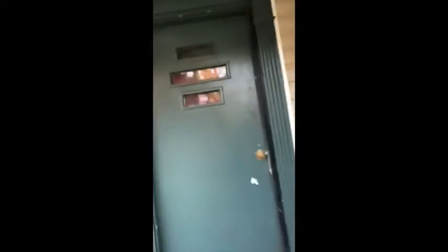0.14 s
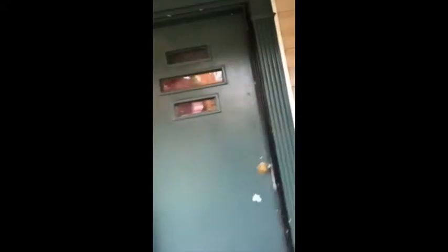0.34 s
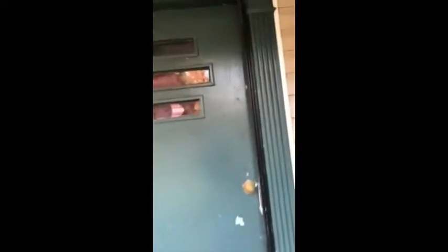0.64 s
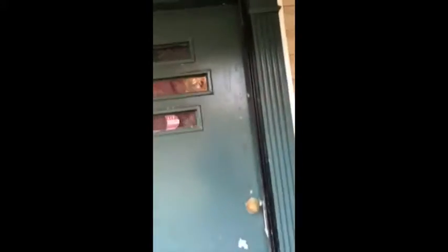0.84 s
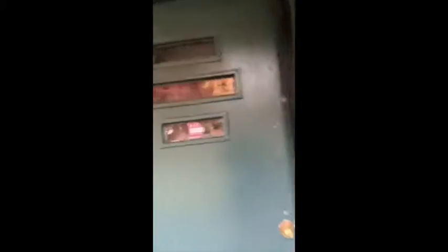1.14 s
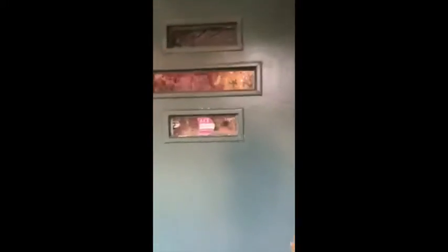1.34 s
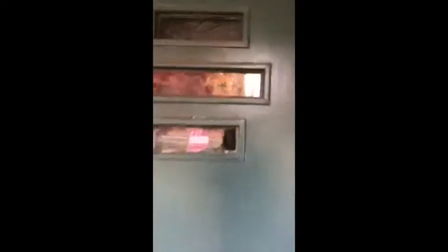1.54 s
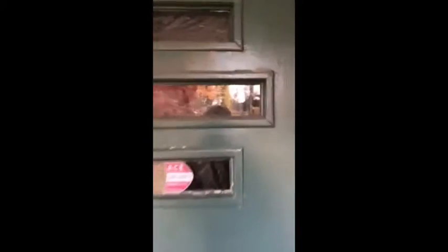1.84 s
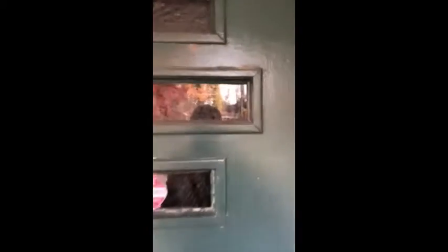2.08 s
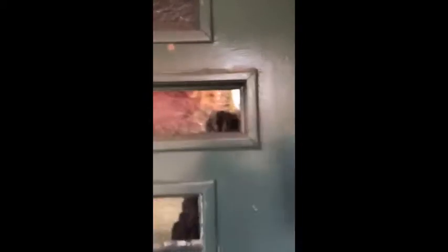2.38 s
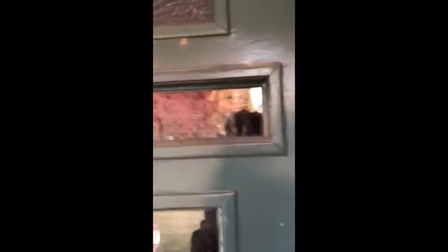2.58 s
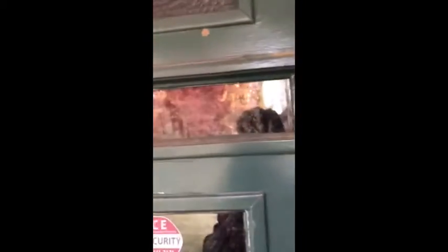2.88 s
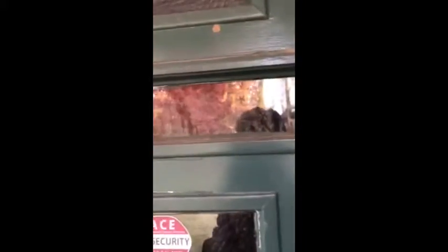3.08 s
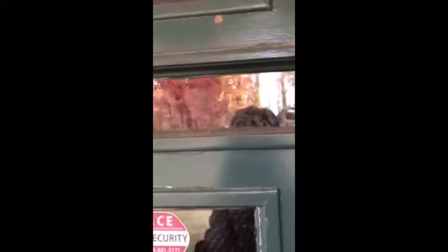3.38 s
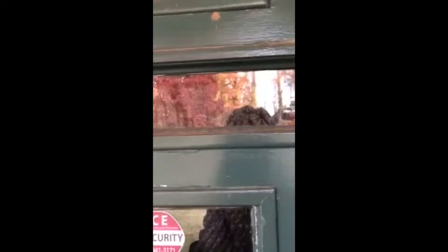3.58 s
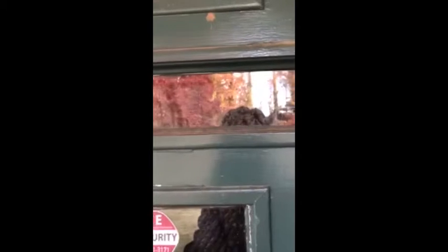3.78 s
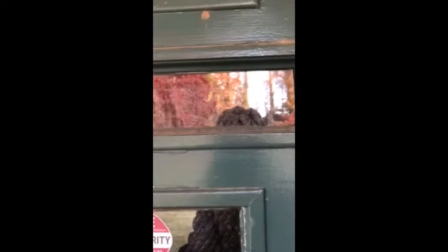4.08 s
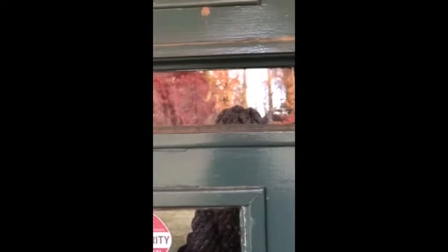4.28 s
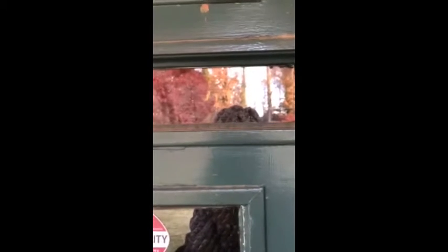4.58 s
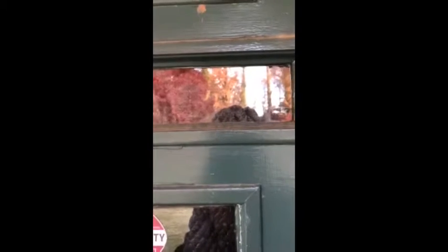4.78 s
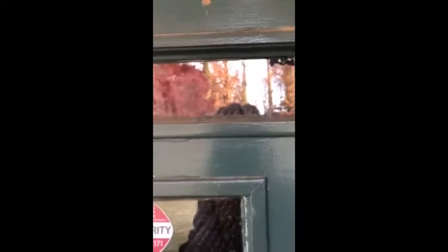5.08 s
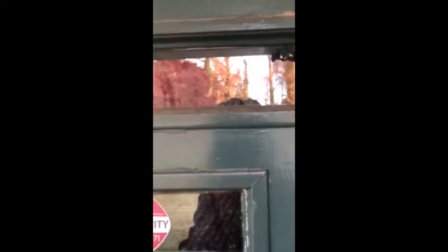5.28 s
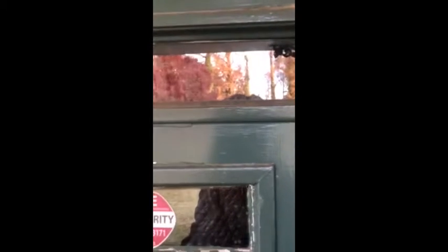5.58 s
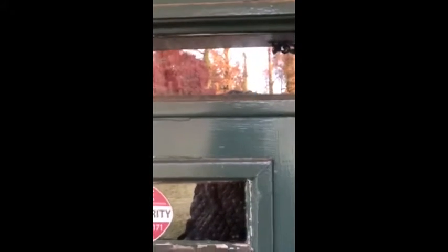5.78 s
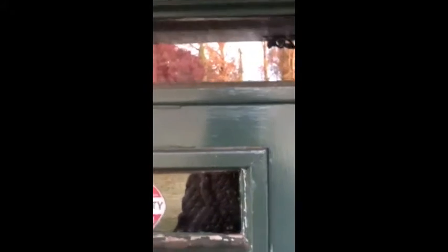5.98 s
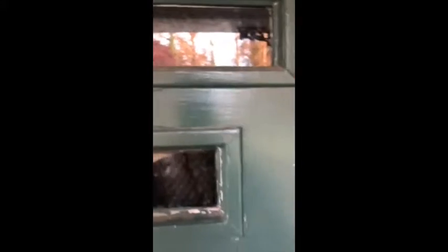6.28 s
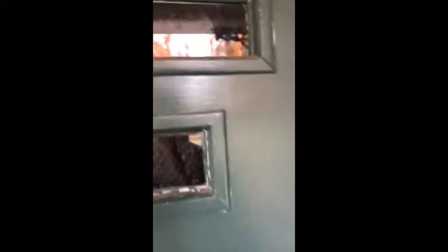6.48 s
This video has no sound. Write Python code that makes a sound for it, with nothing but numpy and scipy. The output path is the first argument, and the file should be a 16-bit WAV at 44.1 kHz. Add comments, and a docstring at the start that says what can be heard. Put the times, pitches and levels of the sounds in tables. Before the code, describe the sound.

Very quiet outdoor doorway, microphone at arm's length from the door. Light footfalls, ticks and cloth hiss lead to five loud, dry knuckle knocks on painted wood: three about a third of a second apart, two with wider gaps. Each has a sharp crack, a damped boxy body and a short porch tail. Afterwards comes a soft dull tap with a board thump and rustling.

```python
"""Knuckles rap five times on a wooden front door with glass panes, heard from the porch at arm's length.
Each blow excites damped door modes; dispersive bending waves carry the treble out first.
Shaped noise gives the skin's crack, the short porch tail and a long faint wash from far house fronts.
Around it, noise bursts make scuffs and ticks, decaying sines make tinkles and footfalls on boards,
swelling hiss makes rubbing cloth, wavering sines a mains hum and smooth noise a far traffic murmur."""
import sys
import numpy as np
from scipy import signal
from scipy.fft import rfft, irfft
from scipy.io import wavfile
from scipy.ndimage import uniform_filter1d

SR = 44100
rng = np.random.default_rng(int(sys.argv[2]) if len(sys.argv) > 2 else 0)


def bounce(signal):
    """Save signal as a 16-bit WAV file at the path given by the first command-line argument."""
    frames = np.transpose(np.atleast_2d(signal))
    limited = np.clip(frames, -1, 1)
    pcm = np.round(limited * 32767).astype(np.int16)
    wavfile.write(sys.argv[1], SR, pcm)


N = 292716   # length in samples

# blows on the door: start_s, level_db, knuckle_gap_s, snap_centre_hz, snap_db, crack_db, panel_ring_db,
# door_thud_db, push_db, crack_tilt_db_per_octave (the part levels are relative to level_db)
KNOCKS = [(2.9182, -6.5, 0.0013, 1040, 0.5, -18, -15.5, -15.5, -3.5, 1),
          (3.2798, -5, 0.0014, 1020, -1, -14.5, -24.5, -14, -9.5, 0),
          (3.65, -5, 0.0014, 720, -2, -13.5, -16, -16.5, -6, -1),
          (4.4161, -5, 0.000646, 1654, -2, -9.5, -18, -13, -10, -3),
          (5.3046, -6, 0.0013, 940, -2.5, -10, -15, -14, -8, 0.5)]


def from_db(db):
    """Level to amplitude: 20 dB is a factor of ten."""
    return 10 ** (np.asarray(db) / 20)


def tilt_db(hz, slope_db, pivot_hz):
    """Spectral tilt: a slope in dB per octave about a pivot."""
    return slope_db * np.log2(hz / pivot_hz)


def rms_one(x):
    """Normalization to unit root-mean-square."""
    return x / np.sqrt(np.mean(x ** 2) + 1e-20)


def in_time(rows):
    """Linear interpolation of each level column at every sample."""
    s, *columns = np.transpose(rows)
    return [np.interp(np.arange(N) / SR, s, c) for c in columns]


def at_hz(points, hz):
    """Linear interpolation of a spectrum on a log-frequency axis."""
    point_hz, values = np.transpose(points)
    return np.interp(np.log(hz), np.log(point_hz), values)


def lumps(size, width):
    """Moving average of white noise: wobble of rms 1 with bumps about width points long."""
    return rms_one(uniform_filter1d(rng.standard_normal(size), max(round(width), 2)))


def drift(rate_hz):
    """Two-pole low-passed noise: a slow random wander of spread about 1."""
    step, settle = 40, 2000   # samples per slow point; slow points dropped while the filter settles
    r = np.exp(-2 * np.pi * rate_hz * step / SR)
    noise = rng.standard_normal(N // step + settle + 2)
    slow = signal.lfilter([1], [1, -2 * r, r * r], noise)[settle:]
    return np.interp(np.arange(N) / step, np.arange(len(slow)), rms_one(slow))


def modes(table, size, spread_db):
    """Impulse response by modal synthesis: one decaying sine per row, with chance strengths."""
    hz, db, t60 = np.transpose(table)[:, :, None]
    t = np.arange(size) / SR
    strength = from_db(db + spread_db * rng.standard_normal(hz.shape))
    signs = (-1) ** np.arange(len(hz))[:, None]
    return signs * strength * from_db(-60 * t / t60) * np.sin(2 * np.pi * hz * t)


def coloured(spectrum, size, peaky_db=0):
    """Spectral shaping of white noise, with chance peaks if asked; rms 1."""
    hz = np.maximum(np.arange(size // 2 + 1) * SR / size, 1)
    peak_width_hz = 300
    peaks_db = peaky_db * lumps(len(hz), peak_width_hz * size / SR) if peaky_db else 0
    gain = from_db(at_hz(spectrum, hz) + peaks_db)
    return rms_one(irfft(rfft(rng.standard_normal(size)) * gain, size))


def add(out, s, sound):
    """Superposition: mix a sound in at time s."""
    i = round(s * SR)
    out[i:i + len(sound)] += sound[:N - i]


def knocks():
    """Modal excitation and dispersion: each blow rings the door, bending waves delay lows by 1 / root of Hz."""
    # natural modes of the whole door and its panels: frequency_hz, relative_db, t60_s
    door_modes = [(46.1, -8.5, 0.39), (60.9, -11, 0.16), (78, -11, 0.45), (94, -16.5, 0.25),
                  (118.8, -13, 0.34), (150.4, -16.5, 0.47), (188.7, -18.5, 0.47), (221, -15.5, 0.43),
                  (250, -14.5, 0.14), (319.4, -1.5, 0.22), (338.7, -4.5, 0.23), (351, -7, 0.163),
                  (380, -1, 0.15), (497.6, -6, 0.084), (588, -4, 0.19), (559.7, -11.5, 0.072),
                  (662, -15, 0.29), (721, -11.5, 0.17), (859, -11.5, 0.19), (937, -8.5, 0.24),
                  (1390, -10, 0.04)]
    # quickly damped modes under the knuckle: frequency_hz, relative_db, t60_s
    spot_modes = [(417.5, -5.5, 0.076), (614, -6.5, 0.0165), (1036, 1, 0.016), (1210, 3, 0.007),
                  (1826, 1, 0.012), (2650, -8, 0.012), (3205, -32, 0.0016), (5760, -22, 0.005)]
    # the panel giving under the hand: frequency_hz, t60_s
    push_hz, push_t60 = (350, .022)
    # three knuckles landing one after another: relative_db
    knuckles_db = (-2, 1, 1)
    # skin on paint: frequency_hz, relative_db (per Hz)
    crack_spectrum = [(1500, 6), (3000, 8.5), (4200, 0.5), (5600, 2), (7000, -8), (9000, -8.5),
                      (16000, -22.5)]
    tail_db = -10   # porch tail, relative to the knock's level
    bending = .045   # travel time (s) times root of Hz

    out, size = np.zeros(N), 32768
    hz, t = np.arange(size // 2 + 1) * SR / size, np.arange(size) / SR
    delay = bending / np.sqrt(np.clip(hz, 40, 2500)) - bending / np.sqrt(2500)
    # phase is the running sum of group delay over frequency
    dispersion = np.exp(-2j * np.pi * np.cumsum(delay) * SR / size)
    travel = dispersion / (1 + 1j * hz / 4000) ** 2   # softened above 4 kHz
    whole_door = np.array(door_modes)[:, 0] < 200
    spot_hz = np.array(spot_modes)[:, 0]
    fade = np.clip((.7 - t) / .3, 0, 1)
    for s, db, gap, snap_hz, snap_db, crack_db, ring_db, thud_db, push_db, slope_db in KNOCKS:
        door = from_db(np.where(whole_door, thud_db, ring_db)) @ modes(door_modes, size, 2.0)
        door += modes([(push_hz, push_db, push_t60)], size, 0)[0]
        # where the hand lands favours the spot modes near one pitch
        favour_db = np.maximum(-7.0 * np.log2(spot_hz / snap_hz) ** 2, -9.0)
        spot = from_db(snap_db + favour_db) @ modes(spot_modes, size, 1.0)
        hand = sum(from_db(k_db) * np.exp(-2j * np.pi * hz * gap * k) for k, k_db in enumerate(knuckles_db))
        blow = irfft((rfft(door) + hand * rfft(spot)) * travel, size)
        tilted = [(f, level_db + tilt_db(f, slope_db, 4000)) for f, level_db in crack_spectrum]
        crack_envelope = from_db(crack_db - 60 * t / .014) * (1 - np.exp(-t / .0006))
        crack = coloured(tilted, size) * crack_envelope
        tail = from_db(tail_db) * porch_tail(size)
        add(out, s, from_db(db) * fade * (blow + crack + tail))
    return out


def porch_tail(size):
    """Reverberation: diffuse reflections and dense upper modes, each band dying at its own rate."""
    # tail colour: frequency_hz, relative_db (per Hz)
    porch_spectrum = [(120, -33.5), (200, -16), (330, -18.5), (600, -18), (800, -24.5), (1050, -27.5),
                      (1400, -24), (2000, -35), (2800, -44.5), (5000, -53.5), (9000, -62), (16000, -73)]
    # reverberation time: frequency_hz, t60_s
    porch_decay = [(200, 0.28), (500, 0.25), (1000, 0.22), (2000, 0.29), (3500, 0.26), (7000, 0.24),
                   (13500, 0.232)]
    t, noise, out = np.arange(size) / SR, coloured(porch_spectrum, size), 0
    edges = 150 * 2 ** np.arange(0, 7.1, .5)   # half-octave band edges, Hz
    for low, high in zip(edges, edges[1:]):
        band = signal.sosfilt(signal.butter(2, [low, high], "band", fs=SR, output="sos"), noise)
        out = out + band * from_db(-60 * t / at_hz(porch_decay, np.sqrt(low * high)))
    build_up = 1 - np.exp(-t / .003)
    # panes and latch rattle, so the tail is lumpy
    return out * build_up * from_db(1.5 * lumps(size, .006 * SR))


def far_echo():
    """Diffuse reflection: far house fronts answer each knock with a faint wash; their powers add."""
    # colour of the wash: frequency_hz, relative_db (per Hz)
    echo_spectrum = [(100, -17.5), (300, 2), (600, 8.5), (1200, 0), (2200, -14), (4000, -37)]
    echo_db, rise_s, t60_s = -44.5, .1, 1.56   # echo_db is relative to the knock's level
    power = 0
    for s, db, *_ in KNOCKS:
        t = np.maximum(np.arange(N) / SR - s, 0)
        envelope = from_db(db + echo_db - 60 * t / t60_s) * (1 - np.exp(-t / rise_s))
        power = power + envelope ** 2
    return np.sqrt(power) * coloured(echo_spectrum, N)


def scuffs():
    """Friction and impact noise: each tick or scuff is a dying noise burst coloured around its centre."""
    # ticks and scuffs: start_s, level_db, centre_hz, t60_s, fall_above_centre_db_per_octave
    tick_rows = [(0.123, -57, 9000, 0.028, -1), (0.133, -51.5, 9600, 0.14, 0),
                 (0.215, -57.5, 10100, 0.1, 2), (.422, -68.5, 12000, 0.2, 0), (0.719, -63, 5800, 0.22, -10),
                 (.764, -51.5, 3600, .13, -13), (1.065, -64.5, 3500, 0.12, -7.5),
                 (1.594, -48.5, 3030, 0.12, -13.5), (1.725, -61.5, 3100, 0.081, -7),
                 (2.304, -55.5, 1020, 0.16, -13), (2.497, -58.5, 3550, 0.22, -9.5),
                 (2.585, -47, 4930, 0.022, -13), (2.647, -47.5, 4200, 0.21, -7.5),
                 (2.745, -48.5, 2220, 0.19, -6.5), (3.421, -56.5, 6000, 0.018, -7),
                 (3.763, -61.5, 6900, 0.034, -10), (4.79, -57, 3300, 0.04, -20),
                 (4.8, -61.5, 4030, 0.023, -4), (4.944, -47, 3770, 0.032, -9.5),
                 (5.56, -47.5, 3530, 0.04, -9.5), (5.604, -55, 3540, 0.037, -8),
                 (6.038, -49.5, 1440, 0.19, -18), (6.068, -34.5, 1800, 0.068, -8),
                 (6.105, -47, 1510, 0.093, -12.5), (6.357, -61, 5500, 0.024, -21),
                 (6.37, -52.5, 5600, 0.019, -17)]
    rise_share, hold_share = 0.02, 0.049   # shares of t60: longer scuffs drag before dying
    out, t = np.zeros(N), np.arange(8192) / SR
    for s, db, hz, t60, fall_db in tick_rows:
        rise = 1 - np.exp(-t / (.0004 + rise_share * t60))
        decay = from_db(db - 60 * np.maximum(t / max(t60, .005) - hold_share, 0))
        # grit makes the burst lumpy
        envelope = rise * decay * from_db(0.79 * lumps(len(t), .0022 * SR))
        spectrum = [(hz / 6, -30), (hz / 2, -3.0), (hz, 0), (hz * 2, fall_db), (hz * 8, 3 * fall_db)]
        add(out, s, envelope * coloured(spectrum, len(t), peaky_db=4))
    return out


def tinkles():
    """Free vibration of small metal bits: three inharmonic partials, two of them beating closely."""
    # tinkles: start_s, pitch_hz, level_db
    tinkle_rows = [(.535, 13100, -62), (.537, 10300, -58.5), (.78, 7150, -61), (.925, 7150, -65),
                   (3.42, 7200, -64), (4.52, 7250, -64), (4.54, 7250, -61), (4.575, 7250, -67),
                   (5.432, 7200, -60.5)]
    t60_s = 0.067
    out, t = np.zeros(N), np.arange(8192) / SR
    for s, hz, db in tinkle_rows:
        partials = [(hz * ratio, db + rel_db, t60_s) for ratio, rel_db in ((1, 0), (1.013, -3), (1.87, -9))]
        add(out, s, modes(partials, len(t), 0).sum(axis=0) * (1 - np.exp(-t / .003)))
    return out


def steps():
    """Modal excitation of the porch boards: each footfall sets their damped resonances thumping."""
    # footfalls: start_s, level_db, brightness_db_per_octave
    footfalls = [(0.133, -58.5, -3), (0.718, -65.5, 10), (1.597, -42, 2.5), (1.628, -50, -7.5),
                 (2.304, -59, 5.5), (6.039, -54.5, 8), (6.07, -44.5, 2.5)]
    # board modes: frequency_hz, relative_db, t60_s
    board_modes = [(140.5, 0, 0.19), (180.6, -4.5, 0.23), (213.5, -2, 0.28), (252, 2, 0.025),
                   (395, 3.5, 0.059), (492, -2.5, 0.078), (710, 2, 0.014)]
    out, board_hz = np.zeros(N), np.array(board_modes)[:, 0]
    for s, db, slope_db in footfalls:
        gain = from_db(db + tilt_db(board_hz, slope_db, 250))
        add(out, s, gain @ modes(board_modes, 16384, 1.5))
    return out


def rustle():
    """Stick-slip friction of fibres: a fine hiss; each rub swells and stops, leaning bright or dull."""
    # cloth hiss: frequency_hz, relative_db (per Hz)
    cloth_spectrum = [(700, -9), (1500, -3), (2050, -1.5), (2600, -3.5), (3500, -4), (4500, -3.5),
                      (5200, -1.5), (5800, -4), (6400, -4.5), (8000, -7), (10900, -9), (16000, -12.5)]
    # clothes never quite still: time_s, level_db
    stirring_curve = [(0, -72), (.6, -76), (1.5, -80), (1.9, -74), (2.9, -69), (3.2, -81), (3.85, -91),
                      (5.1, -87), (5.46, -78), (5.6, -77.5), (6.1, -63.5), (6.45, -75.5), (6.64, -77)]
    # single rubs of cloth: start_s, length_s, level_db, tilt_db_per_octave
    rub_rows = [(0.11, 0.26, -70, 4.5), (0.733, 0.34, -71, -1), (1.083, 0.36, -73, 0.5),
                (1.566, 0.35, -70, 0.5), (2.006, 0.51, -67, 0.5), (2.422, 0.28, -69, -1),
                (5.323, 0.1, -59.5, 0), (5.517, 0.066, -71, 0), (5.564, 0.16, -58.5, 3),
                (5.804, 0.37, -73.5, 0.5), (6.144, 0.24, -55, -2), (6.562, 0.072, -71, -3)]
    attack, release = 0.16, 0.38   # shares of the length
    swell_db = 3   # total rise in level from the start of a rub to its end
    t, hz, out = np.arange(N) / SR, np.arange(N // 2 + 1) * SR / N, 0
    strokes = []
    for s, length, db, _ in rub_rows:
        progress = (t - s) / length
        level = from_db(db + swell_db * np.clip(progress - .5, -1, 1))
        strokes.append(level * np.interp(progress, (0, attack, 1 - release, 1), (0, 1, 1, 0)))
    spectrum = rfft(coloured(cloth_spectrum, N))
    stirring = from_db(in_time(stirring_curve)[0])
    rub_tilts = np.array(rub_rows)[:, 3]
    centres_hz = (2500, 6000, 12000)   # three crossfading bands carry the tilt
    for k, centre_hz in enumerate(centres_hz):
        share = np.interp(hz, centres_hz, np.eye(3)[k])
        lean = from_db(tilt_db(centre_hz, rub_tilts, 6000))
        level = np.sqrt(stirring ** 2 + lean ** 2 @ np.square(strokes))   # powers add
        out = out + level * from_db(1.7 * drift(29.2)) * irfft(spectrum * share, N)
    return out


def hum():
    """Amplitude and phase modulation: mains-hum sines whose level and phase waver."""
    # hum level as the listener walks up and then stands: time_s, low_tone_db, high_tone_db
    hum_levels = [(0.0, -67, -68.5), (0.15, -55, -62), (0.55, -50.5, -70), (.7, -56, -75),
                  (0.9, -51.5, -64.5), (1.55, -64, -59.5), (2.7, -56, -70), (3.099, -53.5, -76),
                  (5.4, -55, -88), (6.64, -52.5, -72.5)]
    # the low and the high tone: frequency_hz
    hum_hz = (119.6, 244)
    # upper partials without a level curve: frequency_hz, level_db
    overtones = [(488, -75), (732, -71)]
    t, out = np.arange(N) / SR, np.zeros(N)
    for hz, db in zip(hum_hz, in_time(hum_levels)):
        level = from_db(db + 0.67 * drift(27) + 1.9 * drift(6.8))
        out += level * np.sin(2 * np.pi * hz * t + 0.31 * drift(2.4))
    for hz, db in overtones:
        out += from_db(db + 2 * drift(4)) * np.sin(2 * np.pi * hz * t + .5 * drift(4))
    return out


def street():
    """Incoherent summation: far traffic merges into smooth, slowly drifting noise."""
    # traffic murmur: frequency_hz, relative_db (per Hz)
    street_spectrum = [(12, -48.5), (20, -21), (60, 1.5), (95, -3.5), (130, -3), (240, -14.5), (400, -13.5),
                       (700, -16), (1100, -13), (1600, -19.5), (2200, -28), (3500, -37), (9400, -46),
                       (16000, -59)]
    street_db = -57.5   # rms level about which the noise drifts
    return from_db(street_db + .6 * drift(2)) * coloured(street_spectrum, N)


def scene():
    """Linear superposition of every source at one microphone."""
    return (knocks() + far_echo() + scuffs() + tinkles() + steps() + rustle() + hum() + street())[None]


def record(dry):
    """Saturation and band limiting: the loudest peaks are rounded, the top is cut."""
    cutoff_hz = 16100
    rounded = .7 * np.tanh(dry / .7)
    return signal.sosfilt(signal.cheby2(12, 45, cutoff_hz, fs=SR, output="sos"), rounded)


dry = scene()
out = record(dry)
bounce(out)
```